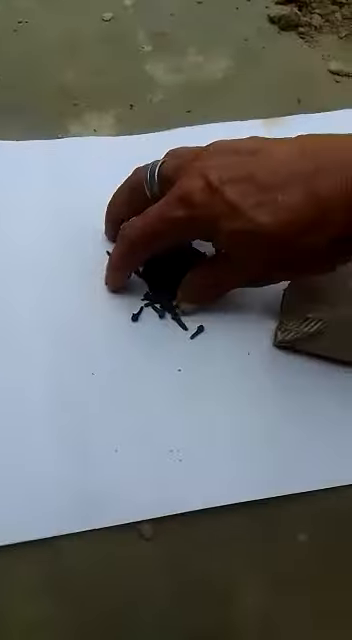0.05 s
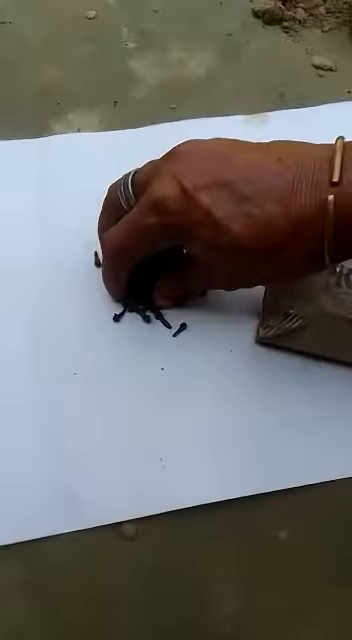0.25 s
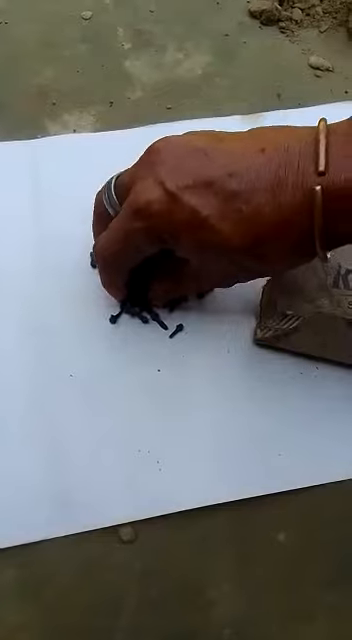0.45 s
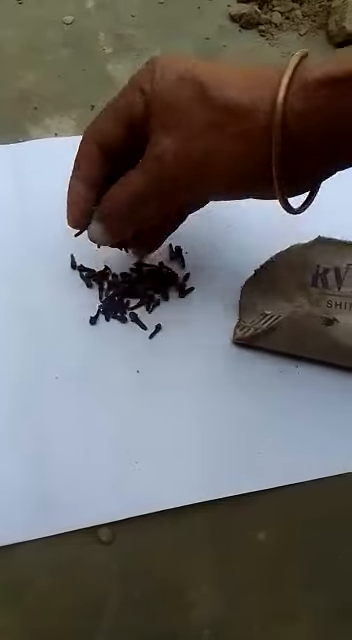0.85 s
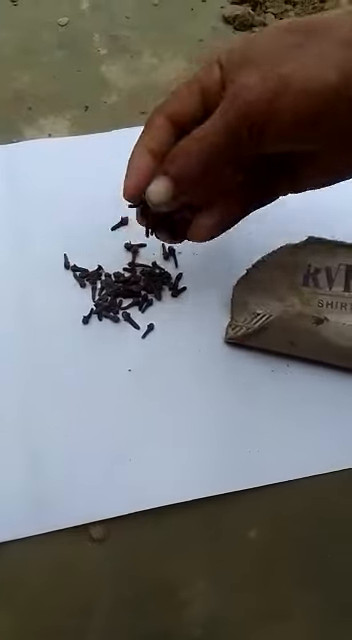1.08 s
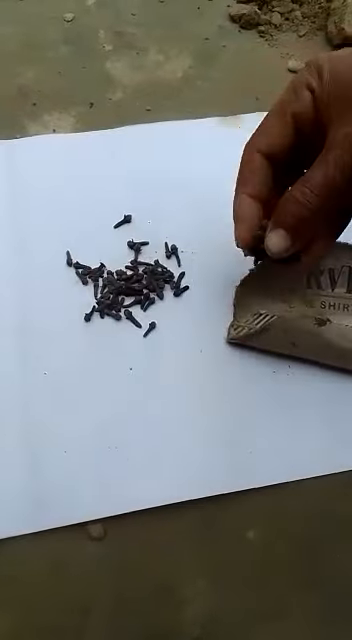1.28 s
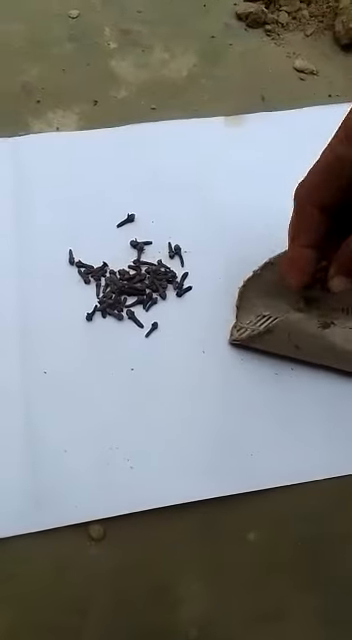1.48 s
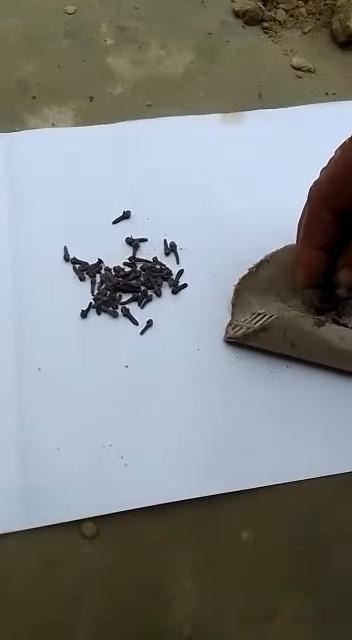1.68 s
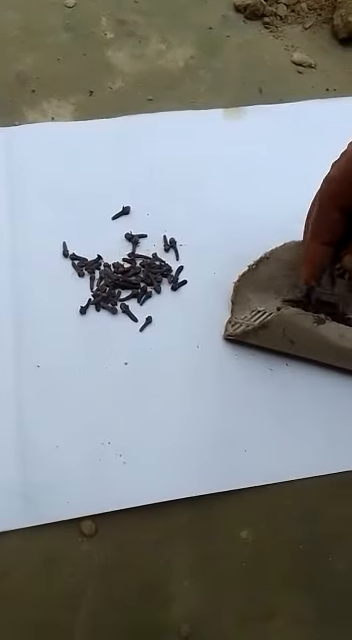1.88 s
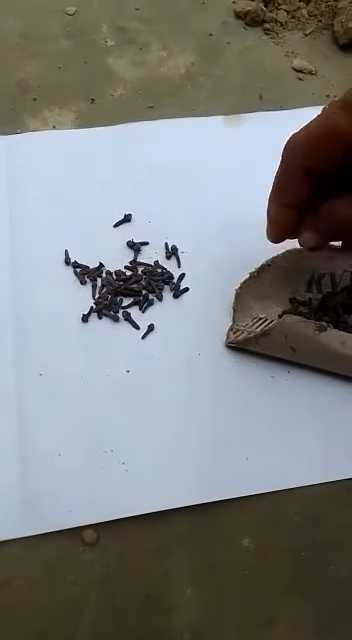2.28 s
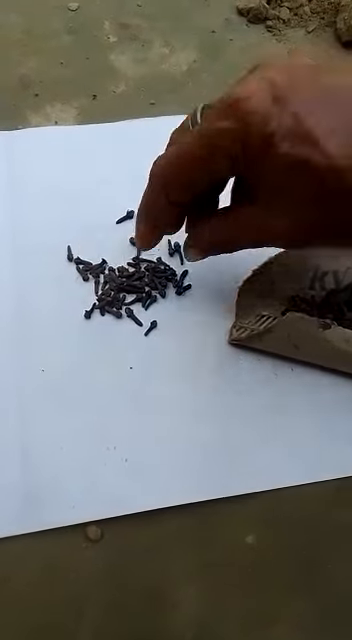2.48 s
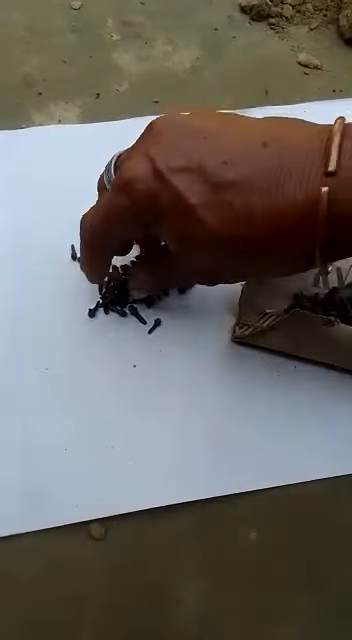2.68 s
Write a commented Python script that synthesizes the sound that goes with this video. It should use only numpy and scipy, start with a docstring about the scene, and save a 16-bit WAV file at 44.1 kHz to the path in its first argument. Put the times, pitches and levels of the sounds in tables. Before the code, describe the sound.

Dried cloves rustle and scrape softly on paper from about 0.2 seconds, with tiny snaps as fingers pinch them until 1 second. A faint distant tone swells and fades, and the hand rubs softly. From 1.5 to 2.2 seconds the cloves trickle onto stiff card in a much louder rattle of ticks and small knocks. Everything is close, with slight echo over a quiet low rumble.

```python
"""A dry rustle over low rumble: fingers gather cloves on paper, sliding the heap and snapping a pinch together.
The hand rubs softly on its way to a stiff card, while one faint far-off tone swells and fades.
Then the pinch trickles down: each clove ticks, knocks and briefly rings the card,
and smaller ones patter in between. All is heard close up, with a faint echo from the walls."""
import sys
import numpy as np
from scipy import signal
from scipy.fft import rfft, irfft, next_fast_len
from scipy.io import wavfile
from scipy.ndimage import uniform_filter1d

SR = 44100
rng = np.random.default_rng(int(sys.argv[2]) if len(sys.argv) > 2 else 0)


def wav_out(sig):
    """Save sig, one row per channel (or a flat mono array), as 16-bit PCM at SR to the path in sys.argv[1]."""
    wavfile.write(sys.argv[1], SR, np.round(np.clip(np.atleast_2d(sig).T, -1, 1) * 32767).astype(np.int16))


N = 125685
T = np.arange(N) / SR
DETUNE = 0.048  # relative pitch spread from clove to clove

# dry, bright colour of clove rubbing on clove: freq_hz, gain_db
RUSTLE_EQ = [(700, -24), (1500, -19.5), (2100, 0.5), (2900, -13.5), (4400, 3.5), (7200, -4), (9500, -21),
             (12500, -17)]
# midrange knock of a clove on the card: freq_hz, gain_db
KNOCK_EQ = [(450, -30.5), (1040, -16.5), (1260, 5.5), (1750, 10), (2800, 5.5), (4200, -4), (8000, -57)]
# crisp tick of the same contact: freq_hz, gain_db
TICK_EQ = [(500, -34), (1500, -4), (3000, 5), (4200, 3), (5500, -6.5), (6600, -6), (9700, -35),
           (16000, -38)]


def amp(db):
    """Decibels to gain."""
    return 10 ** (np.asarray(db) / 20)


def unit(x):
    """Scale to rms 1."""
    return x / np.sqrt(np.mean(x ** 2))


def fader(points):
    """Gain over time from (time_s, level_db) points."""
    return amp(np.interp(T, *np.array(points).T))


def colour(x, eq):
    """Minimum-phase EQ through (freq_hz, gain_db) points."""
    size = 2 * next_fast_len(len(x))
    hz, db = np.array(eq, float).T
    bin_hz = np.arange(size // 2 + 1) * SR / size
    gain = amp(np.interp(np.log(bin_hz + 1), np.log(hz), db))
    cepstrum = irfft(np.log(gain))
    cepstrum[1:size // 2] *= 2  # folded so that nothing rings ahead of a click
    cepstrum[size // 2 + 1:] = 0
    return irfft(rfft(x, size) * np.exp(rfft(cepstrum)))[:len(x)]


def resonate(x, hz, width_hz):
    """One resonance; the narrower it is, the longer it rings."""
    return signal.lfilter(*signal.iirpeak(hz, hz / width_hz, fs=SR), x)


def burst(t60_s, size):
    """Decaying noise of energy 1."""
    x = rng.standard_normal(size) * np.exp(-np.log(1000) * T[:size] / t60_s)
    return x / np.linalg.norm(x)


def contact(t60_s, chatter, size=2048):
    """A sharp touch followed by fine chatter."""
    return signal.unit_impulse(size) + chatter * burst(t60_s, size)


def grains(per_s, spread_db):
    """Tiny contacts at random times and strengths."""
    sizes = amp(spread_db * np.minimum(rng.exponential(size=N), np.log(100)))
    return (rng.random(N) < per_s / SR) * sizes * rng.choice([-1, 1], N)


def flutter():
    """Quick random wavering of rms 1."""
    return unit(uniform_filter1d(rng.standard_normal(N), size=600))


def place(out, start_s, hit, level_db, hit_s=0.0045):
    """Drop in a hit with the energy of level_db held for hit_s."""
    i = int(start_s * SR)
    hit = hit / np.linalg.norm(hit) * np.sqrt(hit_s * SR) * amp(level_db)
    out[i:i + len(hit)] += hit[:N - i]


def background():
    """A bed of low rumble that swells and recedes under quiet, steady air."""
    # weight of the rumble: freq_hz, gain_db
    rumble_eq = [(80, 6), (160, -5), (300, -16)]
    # swell of the rumble: time_s, level_db
    rumble_levels = [(.25, -73.5), (.75, -63.5), (1.2, -65), (1.38, -59.5), (2.25, -63.5), (2.7, -74.5)]
    # soft hiss of the air: freq_hz, gain_db
    air_eq = [(300, -4), (800, -13), (1400, -8), (3200, -24), (15000, -40.5)]
    lowpass = signal.butter(8, 235, fs=SR, output="sos")
    rumble = signal.sosfilt(lowpass, colour(rng.standard_normal(N), rumble_eq))
    air = colour(rng.standard_normal(N), air_eq)
    return unit(rumble) * fader(rumble_levels) + amp(-81.5) * unit(air)


def gathering():
    """Cloves rub together under the fingers in a dense rustle that flickers as they catch and slip."""
    # rise and fall of the rustle: time_s, level_db
    levels = [(.1, -92), (.17, -74.5), (.25, -60), (.33, -63.5), (.45, -68.5), (.49, -64.5), (.62, -72.5),
              (.83, -77), (.88, -73), (.98, -69), (1.05, -105)]
    rustle = unit(colour(grains(per_s=2600, spread_db=3), RUSTLE_EQ))
    catch_db = 2.5 * flutter()
    return rustle * fader(levels) * amp(catch_db)


def hand():
    """Soft, grainy rubbing as the hand moves to the card."""
    # rise and fall of the rubbing: time_s, level_db
    levels = [(.1, -92), (.9, -74.5), (1.25, -82.5), (1.33, -69), (1.42, -70), (1.47, -86.5), (2.5, -81),
              (2.85, -96)]
    # muted colour of the rubbing: freq_hz, gain_db
    rub_eq = [(1000, -16), (1400, -5.5), (1700, -17.5), (2080, 4), (3000, -18), (10000, -33)]
    return unit(colour(grains(per_s=1500, spread_db=1.5), rub_eq)) * fader(levels)


def slides(width_hz=900, paper_db=-4.5):
    """The heap scrapes over the paper; its pitch sinks as it slows."""
    # pushes of the heap: start_s, rise_s, fall_s, level_db, start_hz, end_hz
    pushes = [(0.321, 0.059, 0.13, -57.5, 3940, 2700), (0.463, 0.055, 0.18, -54.5, 4140, 2300)]
    # papery rasp of the sheet: freq_hz, gain_db
    paper_eq = [(600, -47), (1500, 8), (2200, 16), (2600, -3), (3200, 14), (14000, -38)]
    lowpass = signal.butter(2, width_hz / 2, fs=SR, output="sos")
    out = np.zeros(N)
    for start_s, rise_s, fall_s, level_db, start_hz, end_hz in pushes:
        friction = grains(per_s=1300, spread_db=-2.0)
        pitch_hz = np.interp(T, [start_s, start_s + rise_s + fall_s], [start_hz, end_hz])
        carrier = np.exp(2j * np.pi * np.cumsum(pitch_hz) / SR)
        scrape = (signal.sosfilt(lowpass, friction / carrier) * carrier).real  # a gliding band-pass
        paper = amp(paper_db) * unit(colour(friction, paper_eq))
        attack = np.clip((T - start_s) / rise_s, 0, 1)
        release = np.clip(1 - (T - start_s - rise_s) / fall_s, 0, 1) ** 2
        out += amp(level_db) * attack * release * (unit(scrape) + paper)
    return out


def snaps(clove_hz=4630, ring_db=5):
    """Single cloves snap past each other in the pinch, each ringing briefly at its own pitch."""
    # slips in the pinch: start_s, level_db
    slips = [(0.4863, -50), (0.566, -58.5), (0.6, -65.5), (0.647, -76), (.718, -62), (0.725, -62.5),
             (0.7748, -66), (0.8567, -57.5), (0.8818, -52.5), (0.8976, -55.5), (0.9295, -55), (0.963, -57),
             (0.9918, -58.5)]
    out = np.zeros(N)
    for start_s, level_db in slips:
        snap = colour(contact(t60_s=0.022, chatter=1.9), RUSTLE_EQ)
        pitch_hz = clove_hz * (1 + 2 * DETUNE * rng.standard_normal())
        ring = amp(ring_db) * resonate(snap, pitch_hz, width_hz=230)
        place(out, start_s, snap + ring, level_db)
    return out


def far_tone(start_s=0.95, length_s=0.35, pitch_hz=662, flutter_db=4):
    """A faint far-off tone of near-steady pitch swells and fades; its partials flutter."""
    # overtones: harmonic_number, level_db
    partials = [(2, -74.5), (3, -73), (4, -84.5), (7, -92), (9, -91)]
    swell = np.sin(np.pi * np.clip((T - start_s) / length_s, 0, 1))
    phase = 2 * np.pi * np.cumsum(pitch_hz * (1 + 0.0048 * flutter())) / SR
    return swell * sum(amp(db + flutter_db * flutter()) * np.sin(round(k) * phase) for k, db in partials)


def card(x, tuning=1, thud_hz=756, thud_db=-39.5):
    """The struck card rings briefly over a faint, broad, dull thud."""
    # close resonances of the card, each driving the next: pitch_hz, width_hz
    modes = [(2020, 480), (2220, 190), (2420, 780)]
    thud = amp(thud_db) * resonate(resonate(x, thud_hz, thud_hz), thud_hz, thud_hz)
    for pitch_hz, width_hz in modes:
        x = resonate(x, pitch_hz * tuning, width_hz)
    return x + thud


def drops():
    """Each landing clove rings the card at a slightly different pitch, knocks and ticks."""
    # cloves hitting the card: start_s, ring_db, knock_db, tick_db
    landings = [(1.5355, -39.5, -56, -74), (1.5484, -41, -52.5, -62.5), (1.5902, -37.5, -46, -54.5),
                (1.6135, -26.5, -42.5, -58), (1.6225, -29.5, -41, -53.5), (1.651, -43, -50, -62.5),
                (1.6621, -39.5, -48, -44), (1.7148, -30.5, -29.5, -41), (1.729, -51, -45.5, -54.5),
                (1.748, -47.5, -53, -50.5), (1.7645, -44.5, -59.5, -45.5), (1.7833, -40, -51, -47.5),
                (1.7903, -39.5, -47, -56), (1.7976, -35.5, -44.5, -35.5), (1.804, -33, -37, -52.5),
                (1.8082, -37, -49.5, -40), (1.815, -24.5, -39, -50), (1.828, -36, -37.5, -41.5),
                (1.839, -30, -45, -48.5), (1.8501, -32, -38.5, -54), (1.8602, -27, -49.5, -48),
                (1.867, -35.5, -40.5, -45.5), (1.8863, -48, -39.5, -50.5), (1.893, -30, -48, -43),
                (1.8984, -39, -37, -43.5), (1.9251, -49.5, -53.5, -47), (1.9468, -51.5, -50.5, -54.5),
                (1.9904, -36.5, -54, -48.5), (1.9937, -33.5, -41.5, -51.5), (2.03, -50.5, -51, -68),
                (2.0363, -43.5, -39.5, -45), (2.0605, -45.5, -49.5, -52), (2.0754, -38, -39, -55.5),
                (2.0888, -41.5, -35.5, -43), (2.0982, -33, -44.5, -55), (2.105, -38, -42, -47),
                (2.1138, -29, -37.5, -54), (2.1195, -37, -34, -55), (2.1378, -33.5, -40.5, -55.5),
                (2.152, -45.5, -60, -48.5), (2.1795, -48, -60.5, -41.5), (2.3712, -54, -81, -88)]
    out = np.zeros(N)
    for start_s, ring_db, knock_db, tick_db in landings:
        strike = contact(t60_s=0.0019, chatter=0.4)
        tuning = 1 + DETUNE * rng.standard_normal()
        place(out, start_s, card(strike, tuning), ring_db)
        place(out, start_s, colour(contact(t60_s=0.005, chatter=0.96), KNOCK_EQ), knock_db)
        place(out, start_s, colour(contact(t60_s=0.036, chatter=2.7), TICK_EQ), tick_db)
    return out


def flex(x):
    """The whole card flexes with a low, hollow note."""
    return resonate(x, hz=425, width_hz=28)


def linger(x):
    """A light ring hangs on after each landing."""
    # narrow, lingering resonances: pitch_hz
    pitches = [900, 1238, 1388]
    return sum(resonate(x, hz, width_hz=41) for hz in pitches)


def patter(per_s=300, streams=10):
    """Small cloves bounce and tumble on the card, in streams that each have their own short clatter."""
    # surges of patter between the big cloves: time_s, level_db
    levels = [(1.56, -70), (1.6, -47.5), (1.77, -56.5), (1.81, -33.5), (1.9, -35), (1.965, -57),
              (2.06, -60), (2.125, -28), (2.17, -51.5), (2.33, -75.5)]
    tumble = np.zeros(N)
    for _ in range(streams):
        bounces = grains(per_s / streams, spread_db=-0.5)
        tumble += signal.fftconvolve(bounces, burst(t60_s=0.01, size=1024))[:N]
    ring = amp(-10) * unit(card(tumble))
    knock = amp(-10.5) * unit(colour(tumble, KNOCK_EQ))
    tick = amp(-8) * unit(colour(tumble, TICK_EQ))
    falling = (T > levels[0][0]) & (T < levels[-1][0])
    return falling * fader(levels) * (ring + knock + tick)


def sag():
    """The card sags once with a hollow knock."""
    out = np.zeros(N)
    place(out, start_s=1.882, hit=flex(signal.unit_impulse(SR)), level_db=-56)
    return out


def cupped(x):
    """The cupped hand and the surface below colour the rustle with very near reflections."""
    return x + signal.fftconvolve(x, burst(t60_s=0.054, size=1024))[:N] / 2


def walls(x, onset_s=0.0063):
    """A short, soft wash of reflections from the walls."""
    # colour of the room: freq_hz, gain_db
    room_eq = [(200, -3), (1200, 5.5), (4000, 2.5), (16000, -11)]
    tail = amp(-17.5) * burst(t60_s=0.33, size=SR)
    fade_in = np.minimum(T[:SR] / onset_s, 1)
    return signal.fftconvolve(x, colour(tail * fade_in, room_eq))[:N]


def scene():
    """Close mono mix: handling and landings in the room, with the far tone and the rumble behind."""
    landings = drops() + patter() + sag()
    trickle = landings + amp(-1.5) * flex(landings) + amp(1) * linger(landings)
    handling = cupped(gathering() + snaps() + slides() + hand())
    near = handling + trickle
    return (near + walls(near) + far_tone() + background())[None]


def record(dry, top_hz=15700, dc_offset=0.0057):
    """A steep cut of the highest treble, and a small steady offset."""
    lowpass = signal.ellip(8, .1, 60, top_hz, fs=SR, output="sos")
    return signal.sosfiltfilt(lowpass, dry + dc_offset)


dry = scene()
out = record(dry)
wav_out(out)
```